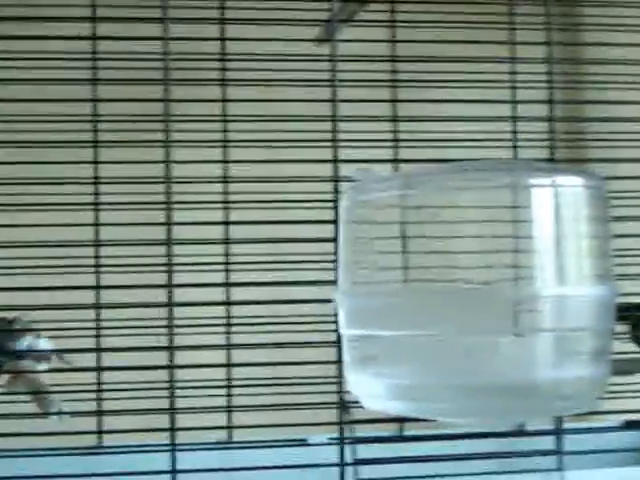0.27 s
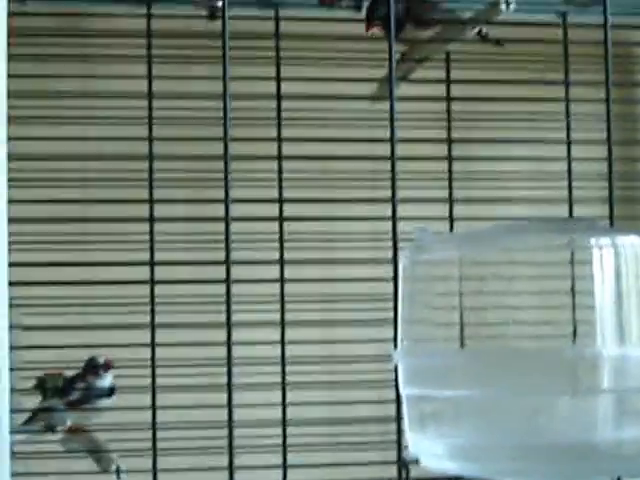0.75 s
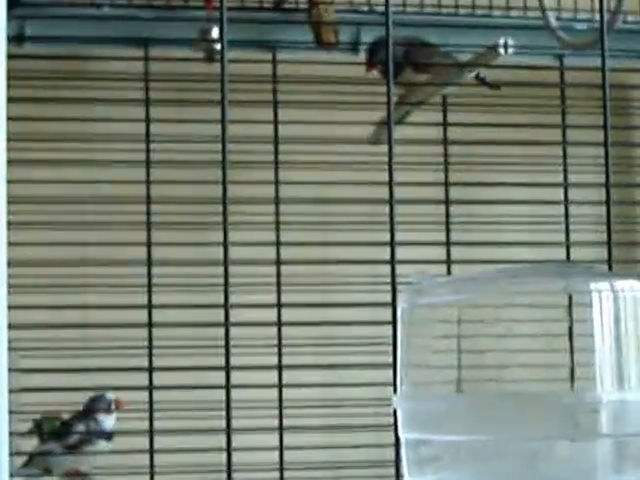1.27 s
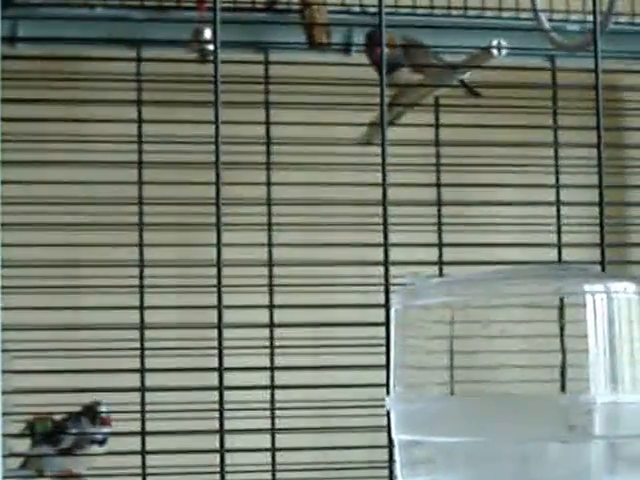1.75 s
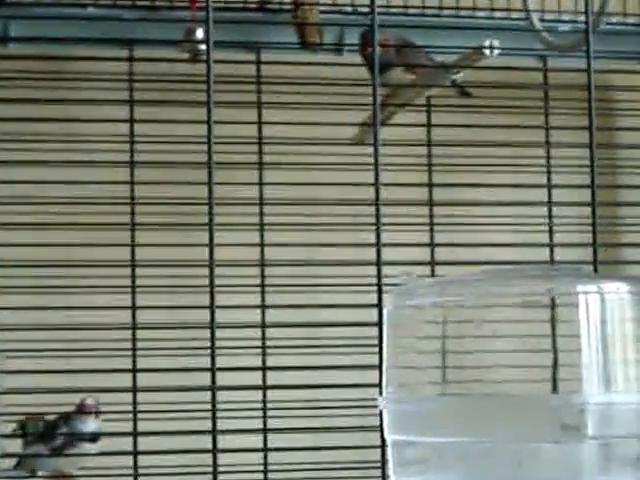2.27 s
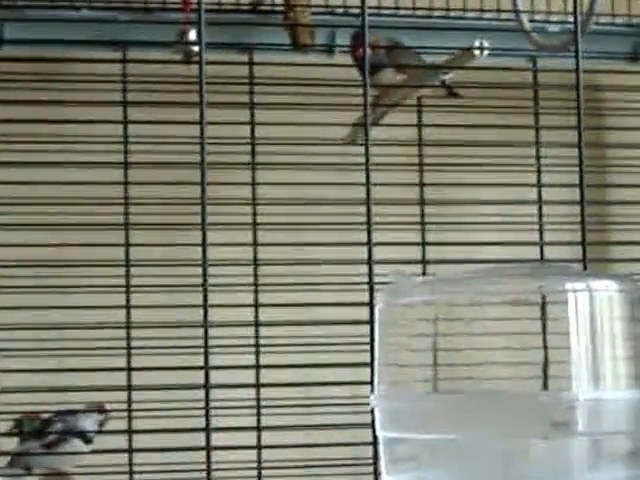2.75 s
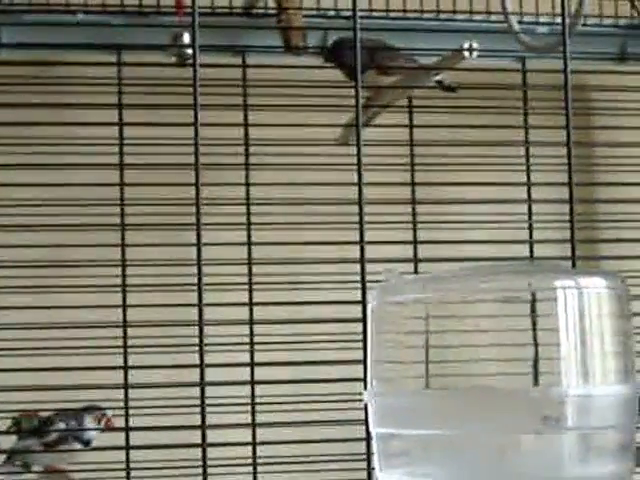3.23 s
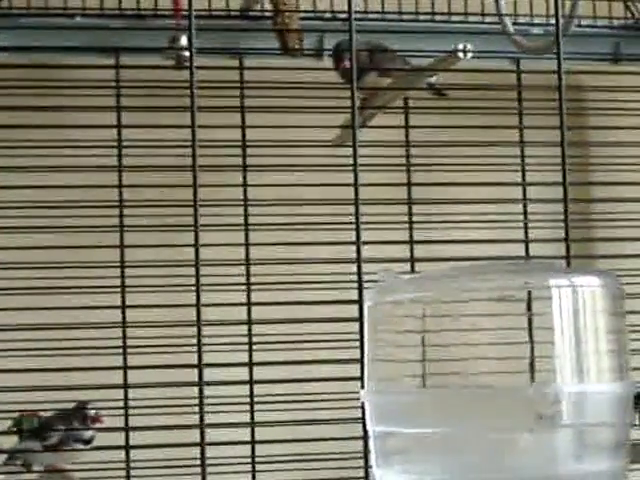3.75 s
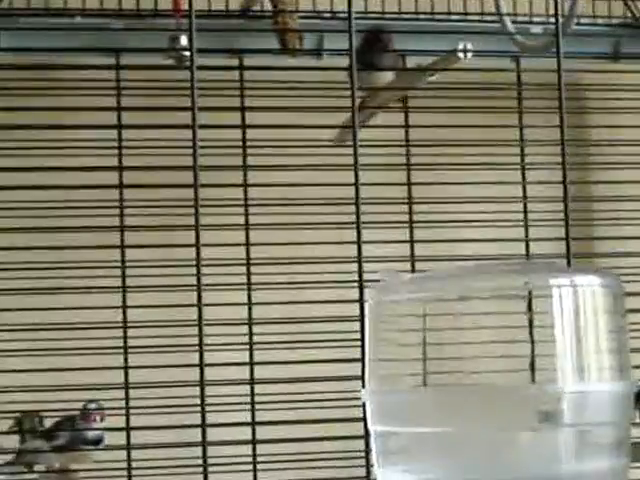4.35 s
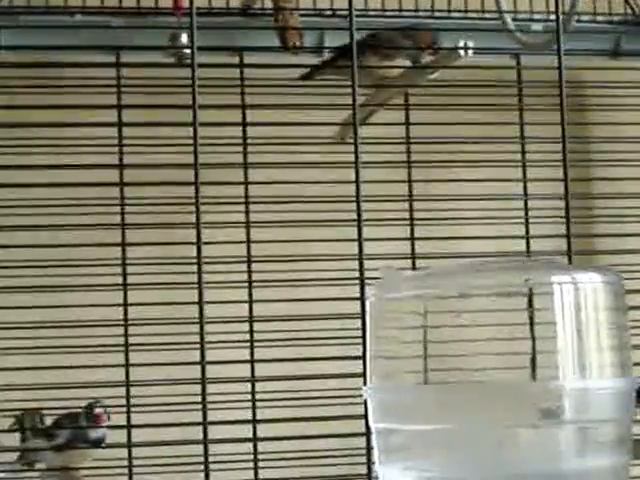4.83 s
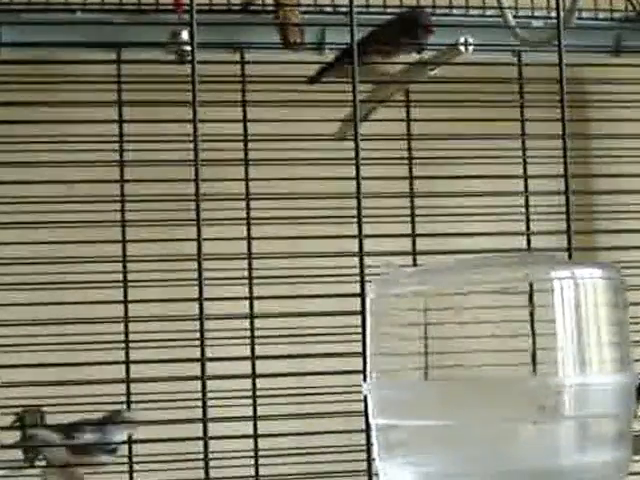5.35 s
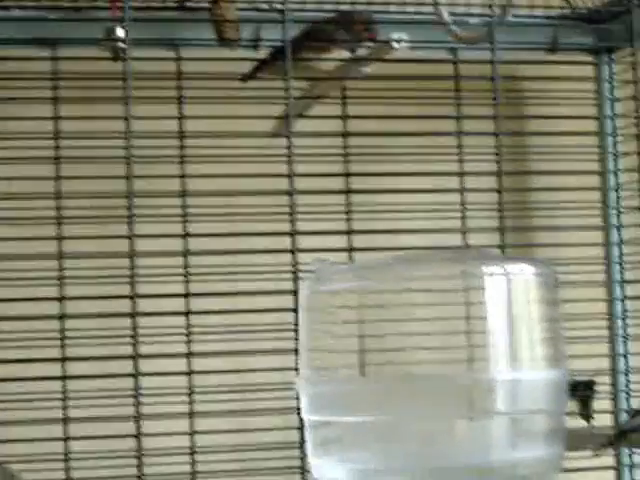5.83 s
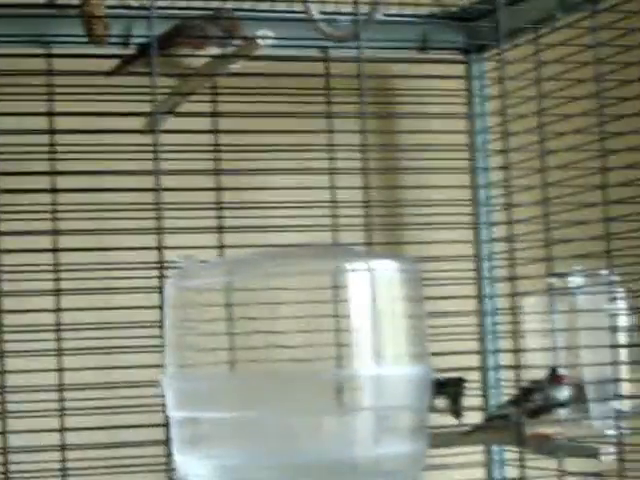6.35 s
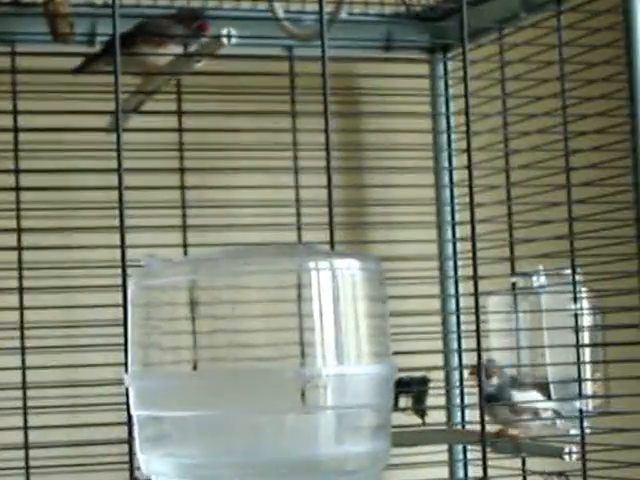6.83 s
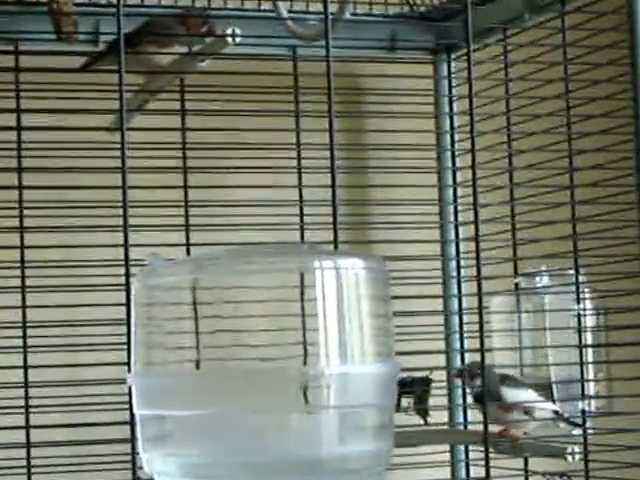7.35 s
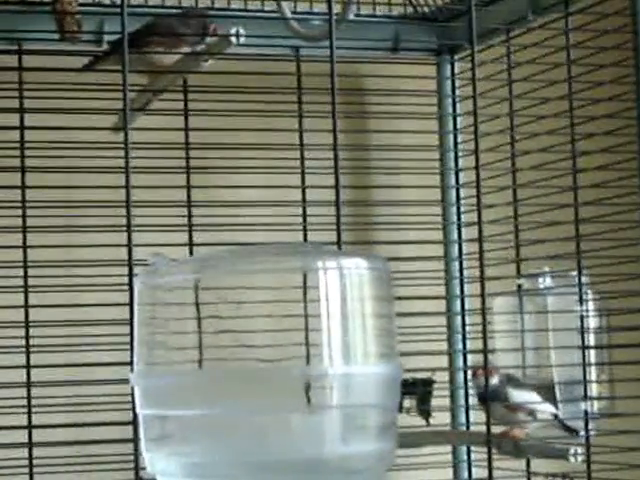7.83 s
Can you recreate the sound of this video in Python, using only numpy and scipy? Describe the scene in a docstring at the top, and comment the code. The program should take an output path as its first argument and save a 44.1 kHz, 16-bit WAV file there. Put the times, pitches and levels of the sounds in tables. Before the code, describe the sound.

Caged finches give brief, buzzy calls at uneven intervals over a steady fan-like hum, with faint ticks and a flutter of wings.

```python
"""Zebra finches call to each other in a wire cage in a small, fairly live room.
Each call is a short nasal buzz: syrinx pulses near 570 Hz, coloured by throat and beak,
with an arch or a fall in pitch. One bird flits across the cage, claws and beak tick on the wire,
and something knocks once. Underneath lie faint ticking, a fan-like hum and hiss,
and a low rumble that swells when the microphone moves."""
import sys
import numpy as np
from scipy import signal
from scipy.fft import rfft, irfft
from scipy.io import wavfile

SR = 44100
rng = np.random.default_rng(int(sys.argv[2]) if len(sys.argv) > 2 else 0)


def materialize(psi):
    """Save the field psi as 16-bit PCM at rate SR to the path in sys.argv[1].

    A 1-D psi becomes a single channel; in a 2-D psi each row is a channel.
    """
    bounded = np.clip(np.atleast_2d(psi).T, -1, 1)
    quanta = np.round(bounded * 32767).astype(np.int16)
    wavfile.write(sys.argv[1], SR, quanta)


N = 356769
TIME = np.arange(N) / SR


def finch_voice(calls, course, throat, sharpen_per_db, sink_octaves, rasp_db, breath_db, tilt_db,
                comb_gain, jitter=0.0429, flutter_hz=700, beak_octaves=0.068, smear=0.223,
                wander_db=4.0, wander_hz=70):
    """Syrinx pulses follow a gesture; their harmonics slide through throat and beak resonances."""
    out = np.zeros(N)
    harmonics = np.arange(1, 25)[:, None]
    shares, *curves = np.transpose(course)
    breath = from_db(breath_db) * noise(lambda f: from_db(at_hz(throat, f)) * (f > throat[0][0]))
    for start, length, pitch_hz, level_db, beak_hz, beak_db, comb_ms in calls:
        at, size = round(start * SR), int(length * SR)
        along = np.linspace(0, 1, size)
        semitones, effort_db, rough = (np.interp(along, shares, curve) for curve in curves)
        # the pulses turn irregular as the pitch collapses
        f0 = pitch_hz * 2 ** (semitones / 12) * (1 + jitter * rough * wobble(size, flutter_hz))
        hz = harmonics * f0
        phase = 2 * np.pi * np.cumsum(f0) / SR
        octaves = np.log2(hz / beak_hz)
        beak = beak_db * np.exp(-.5 * (octaves / beak_octaves) ** 2)
        wander = wander_db * np.array([wobble(size, wander_hz) for _ in harmonics])
        # resonances sink as the beak closes (rise if sink_octaves < 0) and sharpen with effort
        colour = at_hz(throat, hz * 2 ** (sink_octaves * (along - .5))) + beak
        colour *= 1 + sharpen_per_db * effort_db
        gains = from_db(colour + wander + tilt_db * octaves) * (hz < SR / 4)
        gains /= np.sqrt(np.sum(gains ** 2, axis=0) / 2)
        depth = from_db(rasp_db) * rough
        flutter = np.array([wobble(size, flutter_hz) for _ in harmonics])
        rasp = (1 + depth * flutter) / np.sqrt(1 + depth ** 2)
        # the throat smears each pulse, and a puff of air goes with it
        buzz = np.sum(gains * rasp * np.cos(harmonics * phase + smear * harmonics ** 2), axis=0)
        buzz += np.roll(breath, -at)[:size] * (1 + np.cos(phase))
        call = buzz * from_db(level_db + effort_db) * signal.windows.tukey(size, .06)
        # a short delayed copy colours each call's harmonics differently
        steps = np.arange(size + SR // 50)
        direct = np.pad(call, (0, SR // 50))
        delayed = np.interp(steps - comb_ms * SR / 1000, np.arange(size), call)
        out[at:at + len(steps)] += (direct + comb_gain * delayed)[:N - at]
    return out


def gesture(crest, onset_semitones, sag_semitones, collapse_semitones, attack, release_db, rough,
            swell_db=0, burst_db=0, burst_rough=0, burst_share=0.3, collapse_share=0.1754,
            onset_rough=0.11, collapse_rough=0.31):
    """Pitch curves in, sags, then collapses as the pressure goes; the voice roughens at both ends."""
    along = np.linspace(0, 1, 64)
    approach = np.maximum(1 - along / crest, 0) ** 2
    sag = np.maximum((along - crest) / (1 - crest), 0) ** 2
    collapse = np.maximum(1 - (1 - along) / collapse_share, 0) ** 2
    burst = np.exp(-(along / burst_share) ** 4)
    semitones = onset_semitones * approach - sag_semitones * sag - collapse_semitones * collapse
    pressure = 1 - np.exp(-(along + along[1]) / attack)
    effort_db = 20 * np.log10(pressure) + swell_db * (along - .5)
    effort_db += burst_db * burst - release_db * collapse
    roughness = rough + onset_rough * approach + collapse_rough * collapse + burst_rough * burst
    # (position in the call [0-1], bend [semitones], effort [dB], roughness [0-1])
    return np.transpose([along, semitones, effort_db, np.clip(roughness, 0, 1)])


def contact_calls():
    """Short nasal calls: an even arch of pitch that swells slowly."""
    # (start [s], length [s], pitch [Hz], level [dB], beak peak [Hz], its gain [dB], colour delay [ms])
    calls = [(1.315, 0.089, 586.6, -26, 5170, 2, 3.68), (2.073, .071, 594.7, -25, 4260, 3.5, 4.58),
             (2.472, 0.077, 593.5, -25, 4130, -1.5, 1.2), (3.772, 0.08, 585.6, -25, 4170, 0, 2.93),
             (4.723, 0.083, 587, -25, 5000, 5.5, 3.47), (5.140, .076, 586.7, -24, 5300, 1, 5.09),
             (6.806, 0.073, 582, -24, 3400, 5.5, 4.42), (7.995, .074, 588, -24.5, 3500, 7.5, 1.7)]
    # throat colour: (frequency [Hz], gain [dB])
    throat = [(580, -36), (1170, -17), (1750, -25.5), (2330, -17), (2920, -9), (3500, -5), (4100, 0.5),
              (4700, -5.5), (5300, -4), (5900, -5), (6500, -13.5), (7050, -18), (7600, -24), (10000, -36.5)]
    arch = gesture(crest=0.462, onset_semitones=-1.864, sag_semitones=1.693, collapse_semitones=3.5,
                   attack=0.2, release_db=14.5, rough=0.093, swell_db=2.5,
                   collapse_share=0.198, collapse_rough=0.48)
    return finch_voice(calls, arch, throat, sharpen_per_db=0.047, sink_octaves=0.16,
                       rasp_db=7.0, breath_db=-17.5, tilt_db=-1.26, comb_gain=0.33)


def sharp_calls():
    """Loud calls: a harsh burst swoops down two octaves onto a held note."""
    # (start [s], length [s], pitch [Hz], level [dB], beak peak [Hz], its gain [dB], colour delay [ms])
    calls = [(6.585, .092, 568.7, -25, 3400, 1.8, 5.6), (6.732, .085, 565.2, -23, 4240, 6.1, 4.24)]
    # throat colour: (frequency [Hz], gain [dB])
    throat = [(570, -20), (1100, -15), (1700, -15.5), (2300, -10.5), (2850, -4.5), (3450, -3), (4100, 0),
              (5000, -4), (5800, -3.5), (6600, -24), (7600, -25.5), (10000, -31)]
    swoop = gesture(crest=.53, onset_semitones=25, sag_semitones=0.76, collapse_semitones=2.2,
                    attack=0.029, release_db=6, rough=.19, burst_db=6.5, burst_rough=.42)
    return finch_voice(calls, swoop, throat, sharpen_per_db=0.0053, sink_octaves=0.036,
                       rasp_db=2, breath_db=-8.5, tilt_db=-.5, comb_gain=0.42)


def falling_calls():
    """Quieter answers that crest early, slide down and turn hoarse."""
    # (start [s], length [s], pitch [Hz], level [dB], beak peak [Hz], its gain [dB], colour delay [ms])
    calls = [(1.487, 0.062, 564.6, -28.5, 2740, 7.7, 3.13), (3.918, 0.059, 573, -28.5, 2970, 3.7, 3.51),
             (7.031, .060, 587, -28.7, 3420, 4.2, 3.76)]
    # throat colour: (frequency [Hz], gain [dB])
    throat = [(560, -24.5), (1080, -6.5), (1650, -15), (2250, -11), (2900, 0), (3400, -1.5), (4100, -3),
              (5000, -9), (5900, -9), (7000, -14), (8400, -22.5), (9700, -23.5)]
    fall = gesture(crest=0.285, onset_semitones=-1.65, sag_semitones=3.8, collapse_semitones=1.65,
                   attack=0.2, release_db=13, rough=0.11, swell_db=5.0, collapse_share=.22)
    return finch_voice(calls, fall, throat, sharpen_per_db=.015, sink_octaves=-.06,
                       rasp_db=7, breath_db=-17, tilt_db=-1.3, comb_gain=0.12)


def soft_call():
    """A low, clean, nearly level note that drops away at its end."""
    # (start [s], length [s], pitch [Hz], level [dB], beak peak [Hz], its gain [dB], colour delay [ms])
    calls = [(5.024, .104, 518, -34.5, 3100, 3, 1.92)]
    # throat colour: (frequency [Hz], gain [dB])
    throat = [(520, -32), (1040, -5.5), (1560, -15), (2080, -10.5), (2600, -1), (3100, -0.5), (3650, -8.5),
              (4700, -11), (6000, -29), (7500, -27), (10000, -28)]
    held = gesture(crest=0.57, onset_semitones=-0.81, sag_semitones=1.62, collapse_semitones=6.7,
                   attack=0.22, release_db=18, rough=.03, collapse_share=0.12)
    return finch_voice(calls, held, throat, sharpen_per_db=.015, sink_octaves=.04,
                       rasp_db=4, breath_db=-16, tilt_db=0, comb_gain=0.32, wander_db=2)


def wings(take_off_s=5.54, flight_s=.3, edge_s=0.036, beat_hz=27, level_db=-54, fade_db_per_s=13):
    """Each wingbeat rustles feathers and puffs air, fading as the bird glides in to land."""
    beats = (.5 + .5 * np.cos(2 * np.pi * beat_hz * TIME + wobble(N, 8))) ** 2
    feathers = noise(lambda f: f / (f ** 2 + 4000 ** 2))
    whump = from_db(1) * noise(lambda f: f / (1 + (f / 150) ** 3))
    flown_s = np.clip(TIME - take_off_s, 0, flight_s)
    airborne = np.exp(-((TIME - take_off_s - flown_s) / edge_s) ** 2)
    return (feathers + whump) * rms_one(beats) * airborne * from_db(level_db - fade_db_per_s * flown_s)


def knock():
    """A dull knock with two small rebounds."""
    # impacts: (time [s], level [dB])
    hits = [(3.3085, -29), (3.316, -37), (3.332, -34.5)]
    # modes of the struck body: (frequency [Hz], gain [dB], t60 [s])
    modes = [(101, -19, .06), (296, -0.5, 0.026), (560, -11, 0.018), (946, -1, 0.02), (1260, -10, 0.018),
             (1820, -6, 0.015), (2380, -8, .018)]
    clicks = clicks_at(hits)
    return sum((-1) ** i * from_db(db) * ring(clicks, hz, t60) for i, (hz, db, t60) in enumerate(modes))


def cage_ticks():
    """Claws and beak set a cage wire ringing briefly."""
    # light touches: (time [s], level [dB], ring [Hz])
    touches = [(5.857, -40, 9570), (6.068, -44, 4330)]
    return sum(ring(clicks_at([(s, db)]), hz, t60=0.02) for s, db, hz in touches)


def even_ticking(per_s=29.9):
    """Short runs of tiny ticks at a steady rate."""
    # tick runs: (start [s], end [s], level [dB])
    runs = [(0.249, 0.66, -44), (6.186, 6.40, -40)]
    ticks = [(s, db) for start, end, db in runs for s in np.arange(start, end, 1 / per_s)]
    return ring(clicks_at(ticks), hz=3650, t60=.012)


def faint_patter(per_s=45, level_db=-66, centre_hz=3750, t60=0.0069):
    """Tiny irregular ticks, each ringing at one of six close pitches."""
    clicks = (rng.random(N) < per_s / SR) * rng.uniform(0.28, 1, N)
    pitches = centre_hz * np.geomspace(.9, 1.13, 6)
    choice = rng.integers(0, 6, N)
    patter = sum(ring(clicks * (choice == i), hz, t60) for i, hz in enumerate(pitches))
    return from_db(level_db) * rms_one(patter)


def fan(air_db=-42):
    """A steady bed of moving air with a few wavering tones."""
    # air colour: (frequency [Hz], gain [dB])
    air_colour = [(25, -17.5), (50, -15), (95, -11), (170, -2), (205, -5), (275, 4.5), (385, -5), (600, -2),
                  (860, -4), (1050, -11.5), (1400, -13.5), (2200, -17), (3500, -18.5), (6000, -22.5),
                  (10000, -27.5)]
    # hum tones: (frequency [Hz], rms level [dB], waver [Hz])
    tones = [(295.8, -49, 3.19), (341.4, -53.5, 1.524), (846, -54.5, 0.91), (1150, -68.5, 6.7),
             (8950, -72, 7.3)]
    bed = from_db(air_db) * noise(lambda f: from_db(at_hz(air_colour, f)) * (f > 18))
    for hz, db, waver_hz in tones:
        phase = 2 * np.pi * np.cumsum(hz + waver_hz * wobble(N, 12)) / SR
        bed += from_db(db) * rms_one(np.sin(phase) * (1 + 0.4 * wobble(N, 9)))
    return bed


def handling(still_db=-69, corner_hz=42):
    """Deep rumble that swells each time the microphone is moved."""
    # rumble swells: (centre [s], half width [s], level [dB])
    moves = [(.63, .2, -59), (2.3, 0.39, -65), (6.7, 0.11, -60)]
    swells = sum(from_db(db) * np.exp(-((TIME - s) / width) ** 2) for s, width, db in moves)
    return (from_db(still_db) + swells) * noise(lambda f: f / (1 + (f / corner_hz) ** 4))


def room(x, early_db, tail_db, early_s=0.0023, gap_s=0.0021):
    """Dense early echoes from the near wall and cage, then a tail that dies sooner in the treble."""
    # room decay: (frequency [Hz], t60 [s])
    decay = [(200, 0.6), (1200, 0.39), (4000, 0.33), (9000, 0.14)]
    t = TIME[:SR * 3 // 4]
    white = rfft(rng.standard_normal(len(t)))
    freqs = np.fft.rfftfreq(len(t), 1 / SR)
    tail = 0
    for hz, t60 in decay:
        band = at_hz([(f, f == hz) for f, _ in decay], freqs)
        tail = tail + irfft(white * band, len(t)) * np.exp(-np.log(1000) * t / t60)
    tail *= 1 - np.exp(-t / early_s)
    tail *= np.sqrt(2 * np.log(1000) / (decay[2][1] * SR))  # about unity gain at 4 kHz
    early = rng.standard_normal(len(t)) * np.exp(-t / early_s) * (t > gap_s)
    echoes = from_db(early_db) * early / np.linalg.norm(early) + from_db(tail_db) * tail
    return x + signal.fftconvolve(x, echoes)[:N]


def from_db(db):
    """Decibels to gain."""
    return 10 ** (np.asarray(db) / 20)


def rms_one(x):
    """Scale to rms 1."""
    return x / np.sqrt(np.mean(x ** 2) + 1e-20)


def at_hz(points, hz):
    """Read a curve on a log-frequency axis."""
    freqs, values = np.transpose(points)
    return np.interp(np.log(np.maximum(hz, 1)), np.log(freqs), values)


def noise(gain_at):
    """Noise of rms 1, coloured by a gain over frequency."""
    white = rfft(rng.standard_normal(2 ** 19))
    freqs = np.fft.rfftfreq(2 ** 19, 1 / SR)
    return rms_one(irfft(white * gain_at(freqs))[:N])


def wobble(size, rate_hz):
    """Random modulation that glides between values of spread 1."""
    steps = np.arange(size) * rate_hz / SR
    return np.interp(steps, np.arange(1024), rng.standard_normal(1024))


def ring(clicks, hz, t60):
    """A unit click sets a decaying sine of height 1 ringing."""
    radius = np.exp(-np.log(1000) / (t60 * SR))
    angle = 2 * np.pi * hz / SR
    return signal.lfilter([0, np.sin(angle)], [1, -2 * radius * np.cos(angle), radius ** 2],
                          clicks + 1e-18)


def clicks_at(rows):
    """One click for each (time [s], level [dB])."""
    out = np.zeros(N)
    for s, db in rows:
        out[round(s * SR)] = from_db(db)
    return out


def scene():
    """The birds and small cage sounds in the room, over the hum, in mono."""
    birds = room(contact_calls() + soft_call() + falling_calls() + cage_ticks(),
                 early_db=-8, tail_db=-3.5)
    birds += room(sharp_calls(), early_db=-2.5, tail_db=-9.0)
    thud = room(knock(), early_db=-10, tail_db=2.5)
    patter = room(faint_patter(), early_db=-2, tail_db=-11)
    return (birds + thud + patter + even_ticking() + wings() + fan() + handling())[None]


def record(dry):
    """A steep low-pass cuts the top near 10 kHz."""
    return signal.sosfilt(signal.ellip(10, .2, 70, 9980, fs=SR, output="sos"), dry)


dry = scene()
out = record(dry)
materialize(out)
```